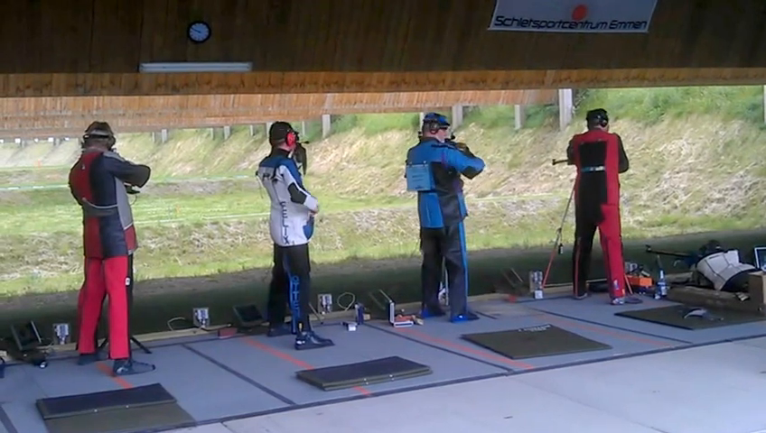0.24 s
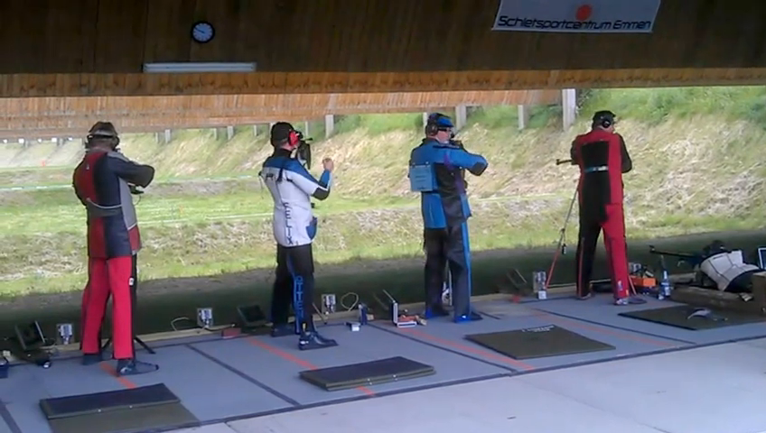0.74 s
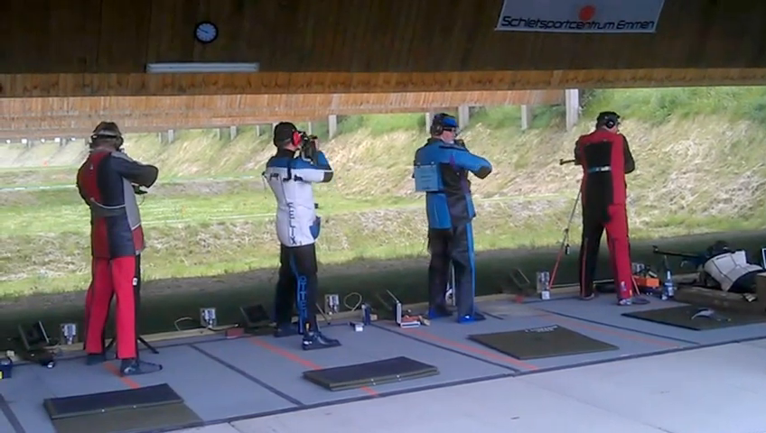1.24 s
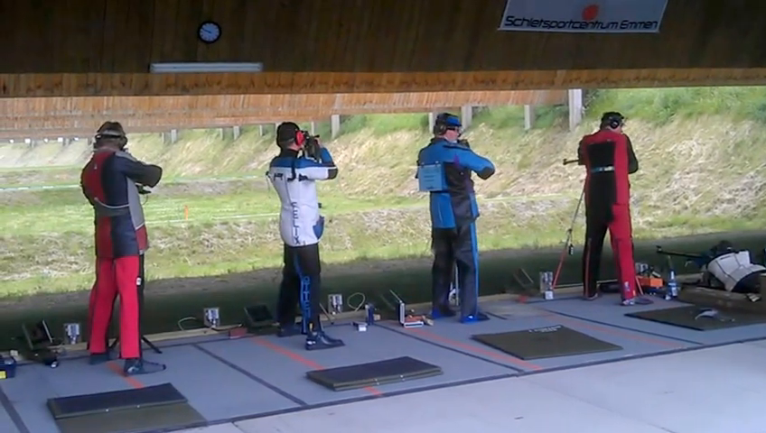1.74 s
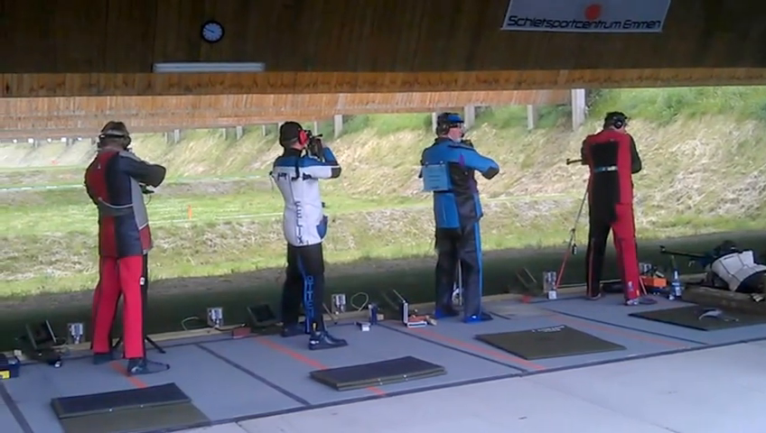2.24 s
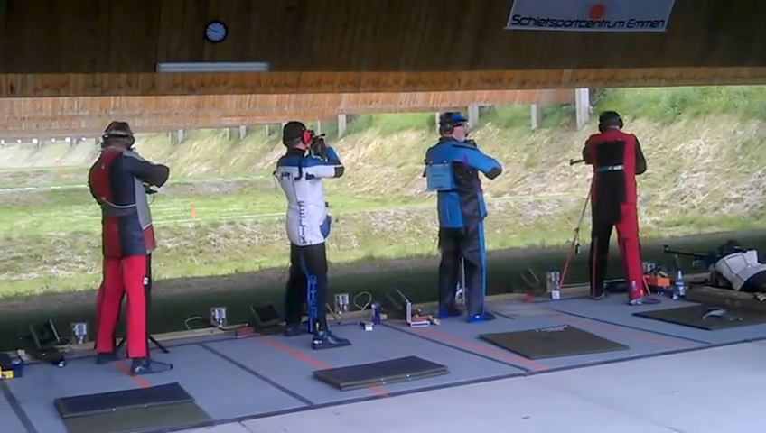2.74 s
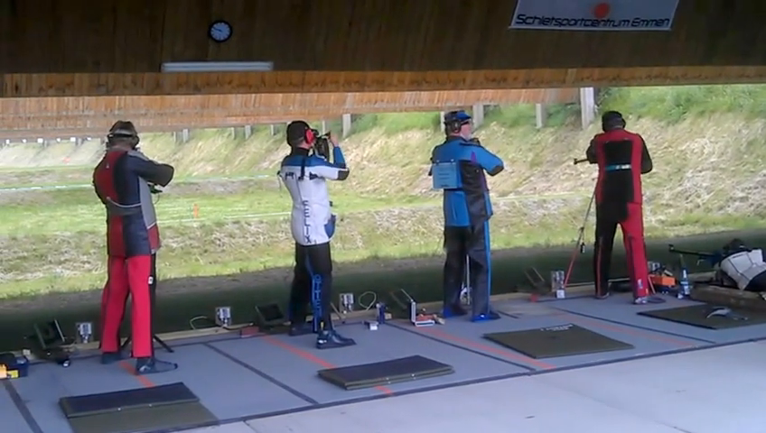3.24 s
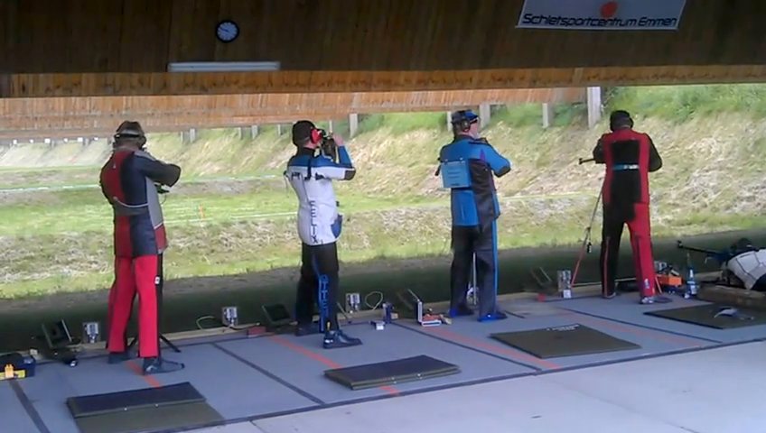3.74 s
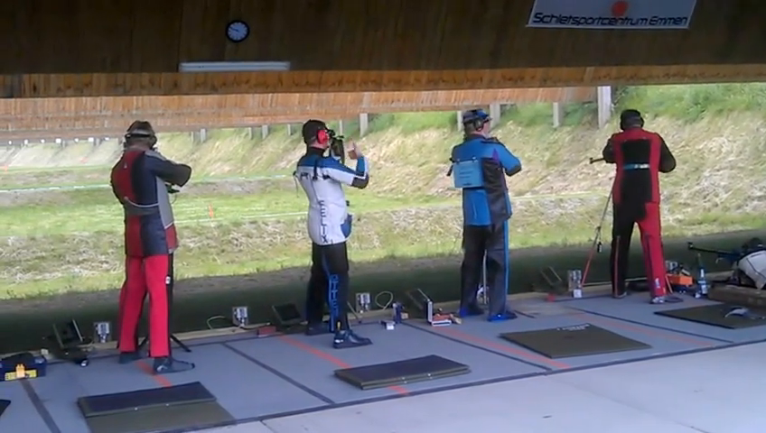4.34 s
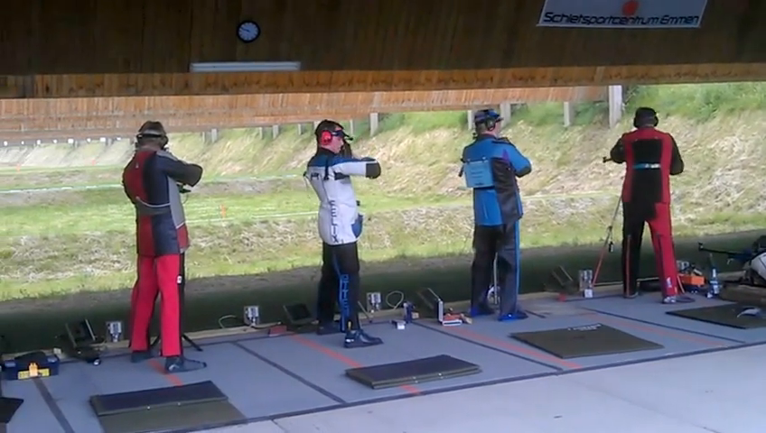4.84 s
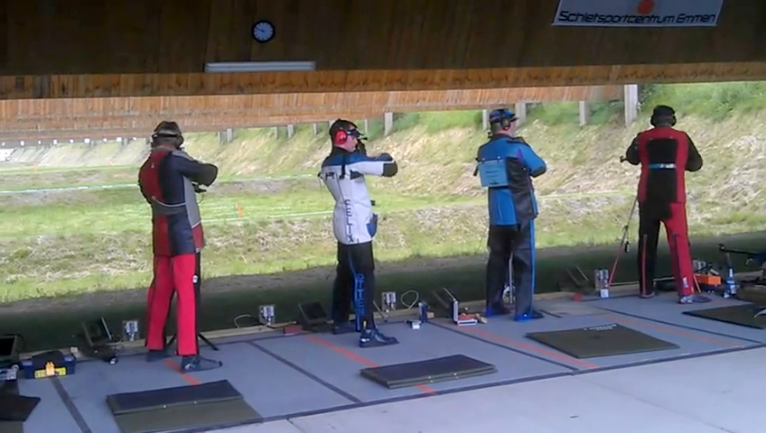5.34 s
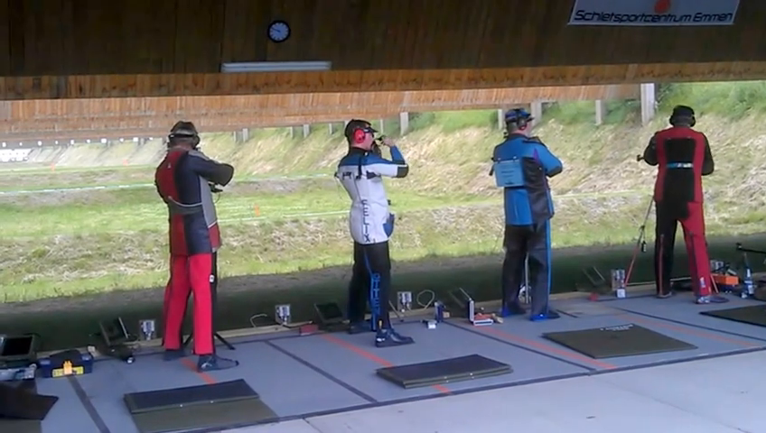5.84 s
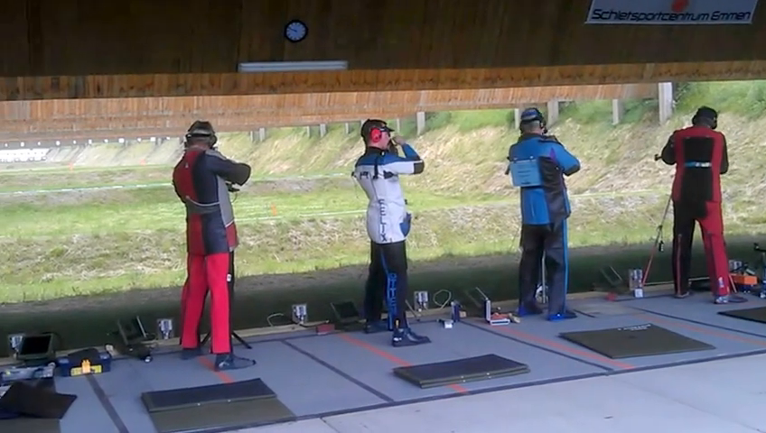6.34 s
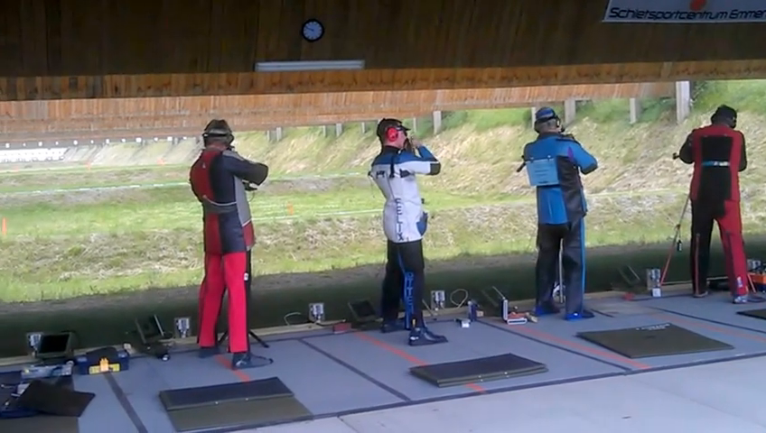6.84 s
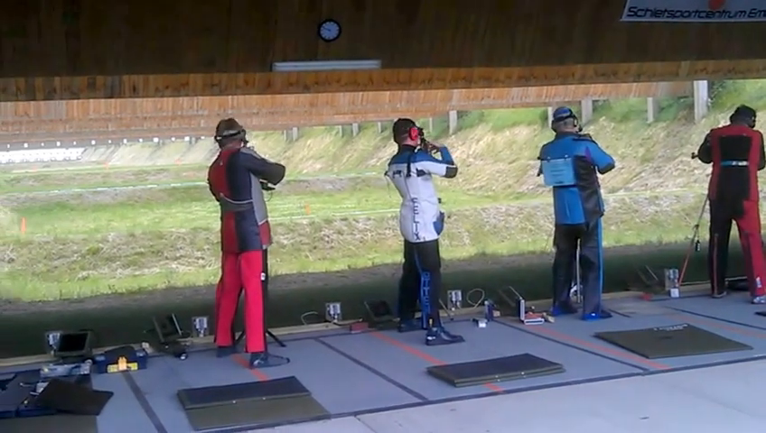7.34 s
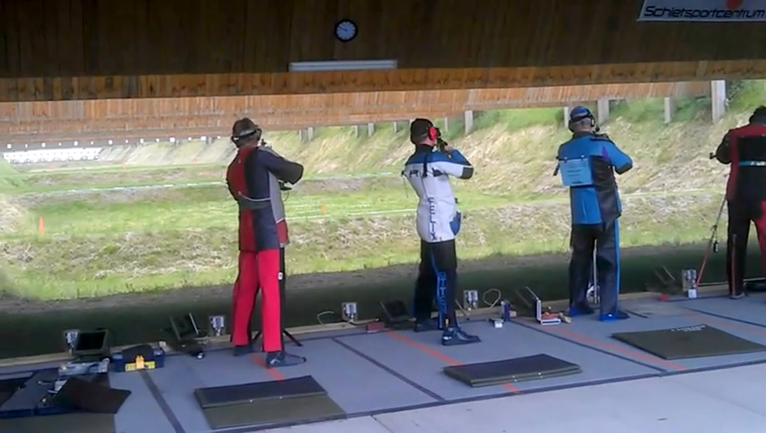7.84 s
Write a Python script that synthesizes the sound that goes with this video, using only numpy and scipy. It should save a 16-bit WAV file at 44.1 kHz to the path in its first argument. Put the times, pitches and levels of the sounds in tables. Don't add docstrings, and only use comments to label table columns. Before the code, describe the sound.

Three sharp rifle shots crack under a roofed outdoor range, each overloading the microphone, then answered by clattering slap echoes and a long rolling boom.

```python
import sys
import numpy as np
from scipy import signal
from scipy.fft import rfft, irfft
from scipy.io import wavfile
from scipy.ndimage import uniform_filter1d

SR = 44100
rng = np.random.default_rng(int(sys.argv[2]) if len(sys.argv) > 2 else 0)


def materialize(psi):
    bounded = np.clip(np.atleast_2d(psi).T, -1, 1)
    quanta = np.round(bounded * 32767).astype(np.int16)
    wavfile.write(sys.argv[1], SR, quanta)


def makeup_ratio(level_db):
    decades = np.asarray(level_db, float) / 20
    return 10 ** decades


N = 357210
TOP_HZ = 13900

# peak t/s, level/dB, centre f/Hz
SLAPS_1 = [(1.4294, -18, 1930), (1.4922, -8.5, 1860), (1.6135, -1, 2250), (1.6262, -19, 2300),
           (1.6295, -2.5, 2470), (1.6585, -9.5, 2470), (1.6737, -8, 2300), (1.809, -20, 2800),
           (1.8135, -16, 2800), (1.8494, 3, 2620), (1.862, 0.5, 2480), (1.8855, -12, 3000),
           (1.8945, -16, 2090), (1.8995, -3, 2300), (1.9025, -8, 1890), (1.9082, -10, 2190),
           (1.926, -14, 2400), (1.934, -10, 2300), (1.9425, -12, 2200), (1.9462, -9, 2030),
           (1.9567, -4.5, 2260), (1.972, -2.5, 2460), (1.977, -10, 2500), (1.9815, -13, 2300),
           (2.0025, -14, 2500), (2.0174, -15, 2510), (2.0824, 0.5, 2800), (2.0954, 1, 2800),
           (2.1278, -14, 2500), (2.1415, -11, 2560), (2.146, -13, 2400), (2.2294, -4, 2400),
           (2.2345, -11, 2400), (2.24, -13, 2300), (2.6193, -24, 2500), (2.6333, -21, 2450),
           (2.647, -23.5, 1350), (2.6888, -18, 1270), (2.688, -26, 2480), (2.7006, -34, 1590),
           (2.7674, -27, 2350)]
SLAPS_2 = [(4.3717, -6.5, 2260), (4.4938, -8, 1880), (4.5059, -8, 2520), (4.5382, -9, 1880),
           (4.586, -11.5, 1740), (4.688, -10, 2700), (4.7294, 5.5, 1840), (4.743, -3, 2600),
           (4.756, -5.5, 2370), (4.7657, -4, 2340), (4.772, -2.5, 2110), (4.7762, -6, 2600),
           (4.7795, -7, 2580), (4.7835, -12, 2300), (4.8083, -6.5, 1910), (4.818, -15, 1900),
           (4.8379, 1.5, 2050), (4.8497, -7, 2000), (4.8788, -13, 2750), (4.883, -14, 2500),
           (4.9615, -2.5, 2030), (4.9757, -5, 2640), (5.0048, -5, 2210), (5.05, -19, 2500),
           (5.0735, -15, 3050), (5.0935, -13, 2200), (5.0985, -13, 2290), (5.104, -12, 2000),
           (5.1097, 3, 1725), (5.155, -10.5, 2250), (5.285, -17.5, 2600), (5.5002, -23, 2100),
           (5.528, -26, 1510), (5.5696, -18.5, 1250), (5.6395, -21, 1700), (5.643, -18, 1500),
           (5.6475, -16, 2080)]
SLAPS_3 = [(6.886, -18, 2260), (6.9716, -13, 2120), (7.0798, -7, 1980), (7.111, -21, 1760),
           (7.204, 1, 1900), (7.25, -10.5, 2040), (7.2718, -9, 2170), (7.4471, 4.5, 2390),
           (7.462, -11, 2980), (7.4844, -12, 2720), (7.492, -21, 2700), (7.5, -13, 3840),
           (7.5068, -18, 2190), (7.5295, -10.5, 3050), (7.5435, -9, 2100), (7.5455, -6, 3900),
           (7.552, -18, 2560), (7.5588, 3.5, 2750), (7.5735, -19, 2270), (7.6048, -5, 2400),
           (7.6883, 4.5, 2700), (7.7021, -3.5, 2540), (7.62, -15, 2300), (7.6975, -17, 2100),
           (7.7155, -17, 2200), (7.7335, -8, 2040), (7.738, -12, 2200), (7.7466, -1, 2010),
           (7.793, -14, 1980), (7.8424, -5.5, 2020), (7.85, -12, 2100), (7.864, -15, 2300),
           (7.889, -15, 2200)]
EVERY_SLAP = SLAPS_1 + SLAPS_2 + SLAPS_3


def on_log(table, hz):
    f, v = np.transpose(table)
    return np.interp(np.log(np.maximum(hz, 1)), np.log(np.maximum(f, 1)), v)


def shaped(x, gain):
    y = irfft(rfft(x) * gain(np.fft.rfftfreq(x.shape[-1], 1 / SR)), x.shape[-1])
    return y / np.sqrt(np.mean(y ** 2))


def hump(hz, width_hz):
    return lambda f: 1 / (1 + ((f ** 2 - hz ** 2) / (width_hz * f + 1)) ** 2)


def resonances(modes):
    return lambda f: sum(makeup_ratio(db) * hump(hz, width_hz)(f) for hz, width_hz, db in modes)


def walk(rate):
    k = int(SR / rate)
    held = np.repeat(rng.standard_normal(N // k + 1), k)
    return 1.4 * uniform_filter1d(uniform_filter1d(held, k), k)[:N]


def pair(chance, like):
    like = np.clip(like, -.95, .95)
    shared = np.sqrt(1 + like) * chance[0]
    opposed = np.sqrt(1 - like) * chance[1] * np.array([[1], [-1]])
    return (shared + opposed) / np.sqrt(2)


def add(out, s, sound, pan_db):
    i = int(s * SR)
    piece = (sound * makeup_ratio(np.array([[pan_db], [-pan_db]]) / 2))[:, :N - i]
    out[:, i:i + piece.shape[1]] += piece


def blasts(shut_s=0.036):
    # t/s, drive level/dB, rise t/s, t60/s, left minus right level/dB
    bursts = [
        (0.9606, -4.5, 0.0002, 0.018, 10),
        (0.9629, 4.5, 0.00032, 0.044, 2.5),
        (.970, -4.5, 0.00061, 0.068, -2),
        (0.9762, -22.5, 0.0005, 0.32, 1),
        (3.818, -6, .002, .04, 0),
        (3.8234, 4.5, 0.00012, 0.066, 3),
        (3.83, -4.5, 0.00034, 0.043, -10.5),
        (6.5172, -9, 0.0017, 0.029, 4),
        (6.522, 7, 0.00033, 0.058, 1),
        (6.528, -16.5, 0.0014, 0.19, -3),
    ]
    # f/Hz, level/dB per Hz
    blast_colour = [(35, -36.5), (60, -12.5), (1480, 4), (2490, 0.5), (4010, 3), (5040, -2.5), (7080, -4.5),
                    (7760, 3), (9090, -3.5), (10700, 4), (13700, -7)]
    out, t = np.zeros((2, N)), np.arange(4096) / SR
    noises = rng.standard_normal((len(bursts), 2, len(t)))
    for (s, db, rise, t60, pan_db), chance in zip(bursts, noises):
        burst = shaped(pair(chance, 0), lambda f: makeup_ratio(on_log(blast_colour, f)))
        fade = makeup_ratio(-60 * t / t60) * np.exp(-(t / shut_s) ** 2)
        add(out, s, makeup_ratio(db) * burst * (1 - np.exp(-t / rise)) ** 2 * fade, pan_db)
    return out


def slaps(tail_s=0.014, edge_db=-10, pan_db=4.5):
    out, t = np.zeros((2, N)), np.arange(-256, 3840) / SR
    before_s, after_s = .0006, .002
    noises = rng.standard_normal((len(EVERY_SLAP), 5, len(t)))
    for (s, db, hz), chance in zip(EVERY_SLAP, noises):
        dull_hz = max(7200 + 260 * db, 3500)
        air = lambda f: np.exp(-(f / dull_hz) ** 2) / (1 + (700 / (f + 1)) ** 4)
        core = np.exp(-(np.abs(t) / np.where(t < 0, before_s, after_s)) ** 2.2)
        turn = 2 * np.pi * hz * t * (1 - t / .04) + 0.53 * chance[2:4, 1:2] + 9 * chance[2, 2]
        rough = shaped(pair(chance, .5), lambda f: hump(hz * .9, hz * 1.9)(f) * air(f))
        edge = shaped(pair(chance[2:], .5), lambda f: hump(4300, 3000)(f) * air(f) / (1 + (f / 6300) ** 8))
        slap = core * (np.sin(turn) + .5 * rough + makeup_ratio(edge_db + db / 5) * edge)
        slap = slap / np.abs(slap.mean(axis=0)).max()
        grains = makeup_ratio(4.1 * shaped(chance[4], lambda f: f < 500))
        trail_db = -23 - 0.73 * np.clip(db, -10, 6) - 4.5
        tail = makeup_ratio(trail_db) * np.clip(t / after_s, 0, 1) * np.exp(-np.abs(t) / tail_s) * grains
        add(out, s + t[0], makeup_ratio(db) * (slap + tail * (rough + .5 * edge)), pan_db)
    return out


def gain_dips(duck_db=14, from_db=-3.5, recover_s=0.025):
    hits = np.zeros(N)
    for s, db, *_ in EVERY_SLAP:
        hits[int((s + .002) * SR)] = max(db - from_db, 0) / -from_db
    t = np.arange(SR // 4) / SR
    recovery = np.exp(-(t / recover_s) ** 2)
    return makeup_ratio(-duck_db * np.tanh(signal.fftconvolve(hits, recovery)[:N]))


def roll_levels(s, hz):
    # t/s, echo level/dB, delay stretch, bass level/dB, extra fade/(dB/s)
    shots = [
        (.9625, -0.5, 1.0, 0, 0.8),
        (3.8235, 0.5, 1.053, 3.5, 2),
        (6.522, -0.5, 1.02, 3, 0.5),
    ]
    # delay t/s, level/dB
    banks = [
        (0, -38.5),
        (.4, -27),
        (.48, -21.5),
        (.58, -16),
        (.66, -17.5),
        (.76, -25),
        (1.3, -29),
        (1.7, -33.5),
        (2.9, -44.5),
    ]
    # f/Hz, level/dB per band
    bank_tone = [(300, -11), (700, -3), (1225, -0.5), (4180, -3.5), (10400, -19.5)]
    # f/Hz, level/dB per band
    wash_tone = [(300, -49.5), (1225, -45), (4180, -30), (10400, -35)]
    # f/Hz, level/dB per band
    quiet_tone = [(300, -52), (1225, -58), (4180, -51), (10400, -53)]
    # peak t/s, level/dB, half length t/s, centre f/Hz
    swells = [(0.255, -45.5, 0.063, 5000), (0.677, -48.5, 0.19, 298), (0.89, -53.5, 0.093, 10000),
              (1.334, -32.5, 0.054, 1780), (1.503, -17.5, 0.016, 1200), (1.57, -16.5, .025, 900),
              (1.95, -21.5, 0.065, 2600), (1.974, -18, 0.011, 2600), (2.148, -25, 0.1, 3240),
              (2.256, -21.5, 0.037, 2780), (2.37, -31, 0.07, 2600), (2.733, -40.5, 0.041, 1000),
              (3.275, -42.5, .12, 3350), (3.545, -48.5, .05, 11000), (4.11, -29.5, 0.032, 1220),
              (4.27, -30, 0.018, 1200), (4.397, -19, .03, 1300), (4.465, -40, 0.022, 400),
              (4.751, -17.5, 0.033, 1770), (4.774, -16, 0.013, 2600), (4.856, -25, 0.082, 3240),
              (4.68, -30, 0.1, 800), (5.14, -20.5, 0.059, 3240), (5.25, -34, 0.2, 650),
              (5.627, -35.5, 0.087, 1580), (5.71, -41, 0.18, 3460), (7.177, -17, 0.022, 1300),
              (7.27, -28, 0.024, 1300), (7.551, -13, 0.008, 2600), (7.597, -29, 0.008, 2600),
              (7.625, -24, 0.01, 2800), (7.648, -24, 0.032, 3000), (7.755, -20.5, 0.05, 2000),
              (7.879, -24, 0.058, 2460), (7.97, -31.5, 0.096, 300)]
    air_db_per_s = 1.5 * hz / 1000
    wash_fall_db_per_s = 30 * (hz / 1e4) ** 0.8
    power = makeup_ratio(2 * on_log(quiet_tone, hz)) + 0 * s
    for shot_s, db, stretch, bass_db, fade_db in shots:
        late = s - shot_s
        bank_db = np.interp(late / stretch, *np.transpose(banks), right=-99) + on_log(bank_tone, hz) + db
        bank_db = bank_db + bass_db * (hz < 600) - (air_db_per_s + fade_db) * late
        wash_db = on_log(wash_tone, hz) - wash_fall_db_per_s * late
        power = power + (late > 0) * (makeup_ratio(2 * np.minimum(bank_db, 0)) + makeup_ratio(2 * np.minimum(wash_db, 0)))
    for peak_s, db, half_s, centre_hz in swells:
        band_db = db - 8 * np.log2(hz / centre_hz) ** 2
        power = power + makeup_ratio(2 * band_db) * np.exp(-((s - peak_s) / half_s) ** 2)
    held = np.exp(-((s - 7.5) / 0.055) ** 2) * (25 - 2 * (hz < 600))
    return 10 * np.log10(power) - held


def roll(grain_db=2.5, flicker_db=1):
    # low f/Hz, high f/Hz
    roll_edges = [(150, 600), (600, 2500), (2500, 7000), (8000, 13500)]
    # f/Hz, level/dB per Hz
    roll_colour = [(30, -45), (49, -49), (103, -19), (252, -7), (586, -4), (797, 2.5), (929, -1.5),
                   (1810, -4), (2870, -14.5), (4000, -17.5), (5500, -27), (6700, -36), (9090, -36.5),
                   (10600, -35), (13700, -43)]
    # f/Hz, left-right correlation
    likeness = [(130, 0.56), (280, 1), (610, -0.55), (1300, 0.31), (13000, 0.03)]
    # f/Hz, left minus right level/dB
    leftward = [(100, 5.5), (250, 1), (1200, 5), (4000, 3), (7300, -4), (13200, 12)]
    s, t = np.arange(0, N / SR, .004), np.arange(N) / SR
    sizes = np.minimum(rng.exponential(size=N // 50 + 1), 3.7)
    lumps_db = grain_db * uniform_filter1d(np.repeat(sizes, 50), 50)[:N]
    loud = np.clip(np.interp(t, s, roll_levels(s, 1225.)) / 15 + 3, 0, 1)
    echoes = rfft(rng.standard_normal((2, N)) * makeup_ratio(loud * (lumps_db - grain_db)))
    f = np.fft.rfftfreq(N, 1 / SR)
    colour = makeup_ratio(on_log(roll_colour, f))
    steady = [10 * np.log10(np.sum(colour[(f > lo) & (f < hi)] ** 2) / len(f)) for lo, hi in roll_edges]
    centres = np.log2([np.sqrt(lo * hi) for lo, hi in roll_edges])
    out = 0
    for octave in np.arange(6.5, 14.1, .5):
        hz = 2 ** octave
        distance = np.clip(np.log2(np.maximum(f, 2 ** 6.5)) - octave, -.5, .5)
        band = np.cos(np.pi * distance) ** 2
        gain_db = roll_levels(s, np.clip(hz, 300, 10400)) - np.interp(octave, centres, steady)
        gain = makeup_ratio(np.interp(t, s, gain_db) + flicker_db * walk(12))
        side = makeup_ratio(on_log(leftward, hz) / 2 * np.array([[1], [-1]]))
        out = out + gain * side * pair(irfft(echoes * colour * band, N), on_log(likeness, hz))
    return out


def roof():
    # f/Hz, width f/Hz, level/dB
    shelter = [(845, 105, 6), (1350, 35, 7), (1433, 48, 0), (320, 36, -3), (2410, 40, -19)]
    # t/s, level/dB, lean to the upper resonances level/dB
    ringing = [(0, -68.5, 0), (.96, -60, -2), (1.3, -34, -1), (2.3, -47, -1), (3.05, -43.5, -0.5),
               (3.8, -51.5, 7), (4.2, -37, -1), (5.5, -39.5, 0.5), (6.5, -46.5, 2), (7, -54, 3),
               (8.1, -36.5, -2)]
    s, level_db, lean_db = np.transpose(ringing)
    t = np.arange(N) / SR
    ring = shaped(rng.standard_normal((2, N)), resonances(shelter))
    low = signal.sosfiltfilt(signal.butter(4, 1100, fs=SR, output="sos"), ring)
    lean = makeup_ratio(np.interp(t, s, lean_db))
    level = makeup_ratio(np.interp(t, s, level_db) + np.array([[1.5], [-1.5]]))
    return (low / lean + (ring - low) * lean) * level


def knocks(cycles=1.75):
    # peak t/s, right port level/dB, f/Hz, left minus right level/dB
    puffs = [(0.393, -32, 228, -12), (0.4157, -37, 193, -6), (0.492, -36, 230, -11), (0.528, -30, 233, -14),
             (0.568, -28.5, 254, -16), (0.656, -30, 200, -17), (0.6743, -27, 228, -13),
             (0.695, -31, 220, -12), (0.7233, -29, 290, -16), (0.749, -28, 250, -20),
             (0.7678, -29, 218, -18), (0.7978, -26.5, 199, -11), (0.8282, -19, 202, -11),
             (0.883, -30.5, 208, -15), (7.077, -12, 310, -21), (7.1094, -11, 320, -13),
             (7.1185, -11, 258, -26), (7.1352, -5.5, 290, -26), (7.2643, -6, 270, -21),
             (7.286, -0.5, 283, -6), (7.3, -13, 250, -8), (7.331, -7, 263, -25), (7.3437, -12, 270, -3),
             (7.3584, -5, 220, -19), (7.3719, -2.5, 215, -10.5), (7.3859, -8.5, 310, -10),
             (7.3994, -4, 240, -13)]
    out, t = np.zeros((2, N)), np.arange(-600, 1400) / SR
    noises = rng.standard_normal((len(puffs), 2, len(t)))
    for (s, db, hz, pan_db), chance in zip(puffs, noises):
        puff = np.exp(-(t * hz / np.where(t < 0, 0.25 * cycles, cycles)) ** 2)
        rumble = shaped(chance, hump(hz * 2, hz * 2))
        tone = np.sin(2 * np.pi * hz * t + 9 * chance[0, 0] + .5 * chance[:, 1:2])
        thump = tone + .45 * makeup_ratio(db / 3) * rumble
        add(out, s + t[0], makeup_ratio(db + pan_db / 2) * puff * thump, pan_db)
    return out


def clinks():
    # t/s, level/dB, centre f/Hz, t60/s, ring level/dB
    hits = [(0.061, -38.5, 10900, 0.36, -38), (.204, -28.5, 11600, 0.046, -13.5),
            (.22, -44, 8900, 0.36, 1.5), (2.02, -33.5, 12600, 0.84, 4.5), (3.733, -35, 1790, 0.74, -84.5),
            (3.734, -45, 7850, 0.54, -75), (5.144, -20, 4400, 0.54, -19), (5.165, -22.5, 11100, 0.41, -23),
            (4.35, -38, 11000, 0.25, -40), (5.567, -33, 10500, 0.59, -25), (5.582, -36, 8000, 0.41, -25),
            (5.595, -33, 3600, 0.6, -25), (5.637, -33, 11000, 0.15, -25), (5.897, -45, 9500, 0.3, -23),
            (5.924, -43, 11000, 0.46, -23), (6.399, -38.5, 8900, 0.36, -23)]
    # f/Hz, level/dB, t60/s
    case = [(5710, -5, 0.59), (11070, -5, 0.55), (12640, -5, 0.44), (13250, 0, 0.55)]
    out, t = np.zeros((2, N)), np.arange(16384) / SR
    noises = rng.standard_normal((len(hits), 3, len(t)))
    for (s, db, hz, t60, ring_db), chance in zip(hits, noises):
        rattle = makeup_ratio(1.8 * shaped(chance[2], lambda f: f < 90))
        width_hz = min(1.1 * hz, 1.3 * (TOP_HZ - hz))
        burst = shaped(pair(chance, 0.087), hump(hz, width_hz)) * rattle * makeup_ratio(-60 * t / t60)
        ring = 0
        for f, mode_db, long in case:
            ring = ring + makeup_ratio(mode_db - 60 * t / long) * shaped(chance[:2], hump(f, 190 / t60))
        add(out, s, makeup_ratio(db) * np.minimum(t / 0.0007, 1) * (burst + makeup_ratio(ring_db) * ring), 4)
    return out


def scrape(peak_s=3.29, half_s=0.19, db=-44):
    # f/Hz, width f/Hz, level/dB
    gear = [(1620, 27, 3), (1790, 79, -4), (2400, 118, -3), (3000, 74, -5), (3390, 91, -6),
            (3880, 100, -11)]
    t = np.arange(N) / SR
    body = shaped(rng.standard_normal((2, N)), resonances(gear))
    return body * makeup_ratio(db + 1.2 * walk(30)) * np.exp(-((t - peak_s) / half_s) ** 4)


def bird(hz=5100.0, sweep_hz=-9000., note_s=0.013, db=-55.5):
    out, t = np.zeros((2, N)), np.arange(-1024, 1024) / SR
    note = np.exp(-(t / note_s) ** 2) * np.sin(2 * np.pi * (hz + sweep_hz * t / 2) * t)
    for s in np.arange(.375, .75, .07):
        add(out, s + t[0], makeup_ratio(db) * note, 0)
    return out


def scene():
    ducked = gain_dips() * (roll() + roof() + clinks())
    return blasts() + slaps() + ducked + knocks() + bird() + scrape()


def masked(x, band_hz=430):
    # f/Hz, level/dB under the loudness
    mask = [(5500, -55), (7000, -50), (9000, -37), (11000, -43), (13000, -31)]
    f, _, z = signal.stft(x, SR, nperseg=2048)
    power = (np.abs(z) ** 2).mean(axis=0)
    for lo in np.arange(5500, TOP_HZ, band_hz):
        band = (f >= lo) & (f < lo + band_hz)
        threshold = makeup_ratio(2 * on_log(mask, lo) + 5 * rng.standard_normal(z.shape[2]))
        z[:, band] *= power[band].sum(axis=0) > power.sum(axis=0) * threshold
    return signal.istft(z, SR, nperseg=2048)[1][:, :N]


def top_cut(x):
    return signal.sosfilt(signal.butter(12, 13840, fs=SR, output="sos"), x)


def record(dry):
    cut = signal.sosfilt(signal.butter(2, 90, "high", fs=SR, output="sos"), dry)
    cut = signal.sosfilt(signal.ellip(8, .2, 60, TOP_HZ, fs=SR, output="sos"), masked(cut))
    return top_cut(np.clip(cut, -1, 1))


dry = scene()
out = record(dry)
materialize(out)
```